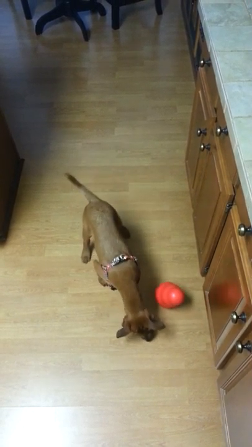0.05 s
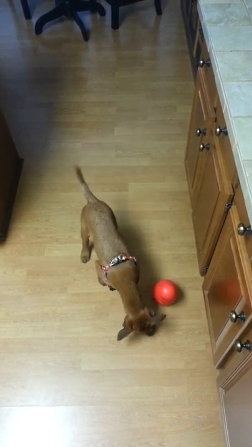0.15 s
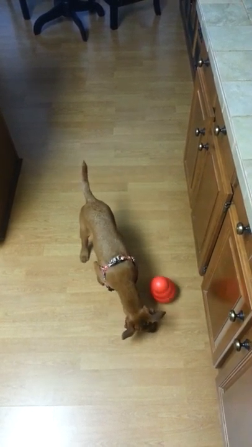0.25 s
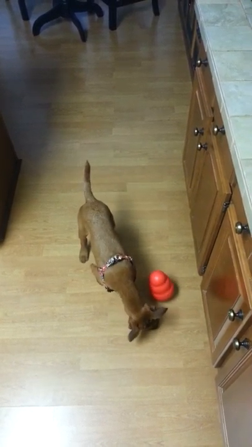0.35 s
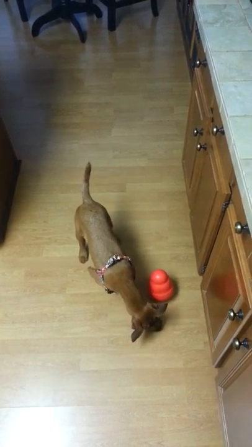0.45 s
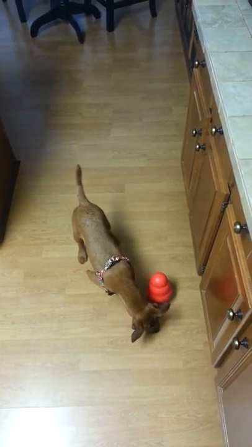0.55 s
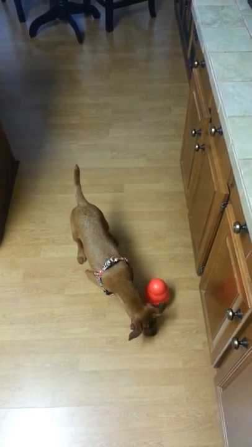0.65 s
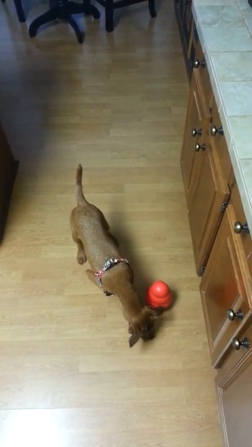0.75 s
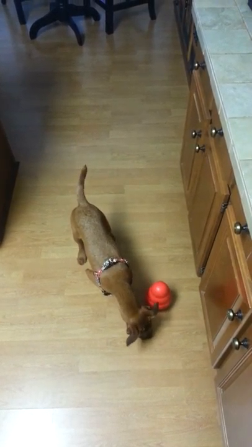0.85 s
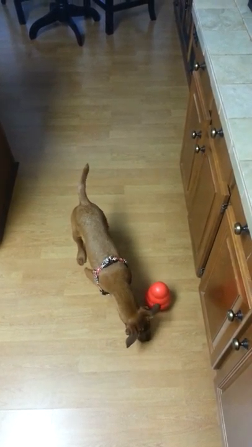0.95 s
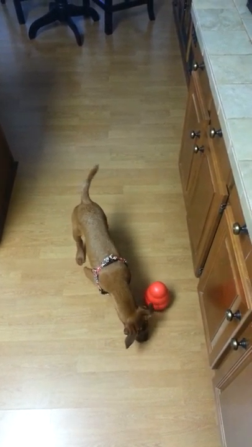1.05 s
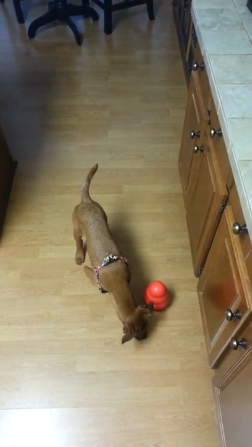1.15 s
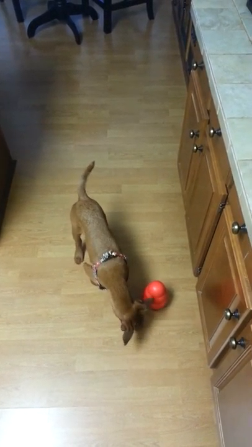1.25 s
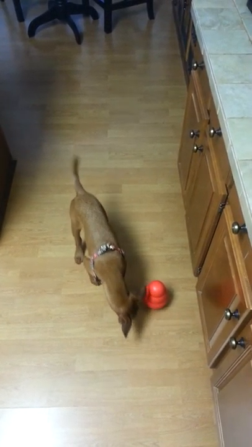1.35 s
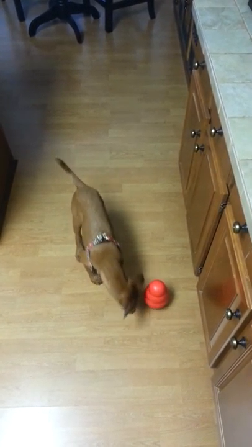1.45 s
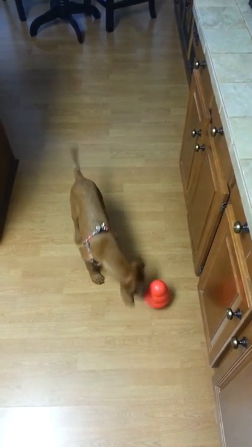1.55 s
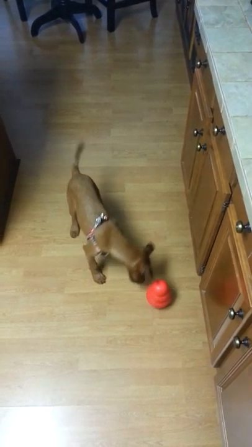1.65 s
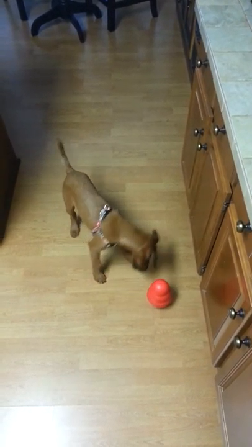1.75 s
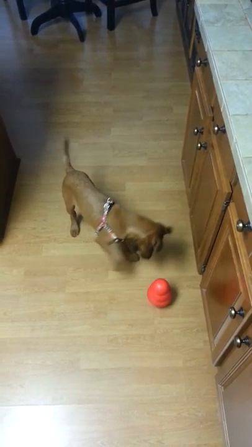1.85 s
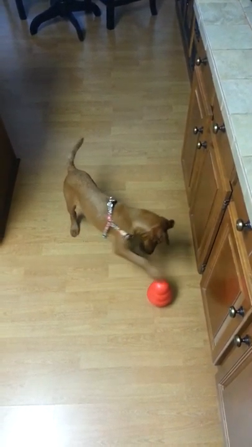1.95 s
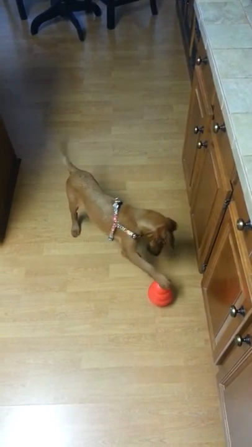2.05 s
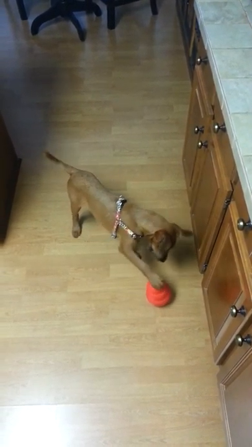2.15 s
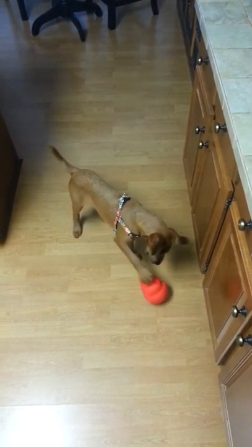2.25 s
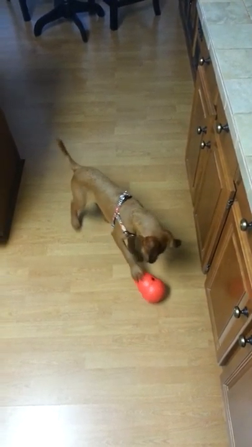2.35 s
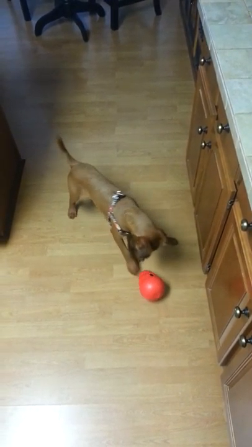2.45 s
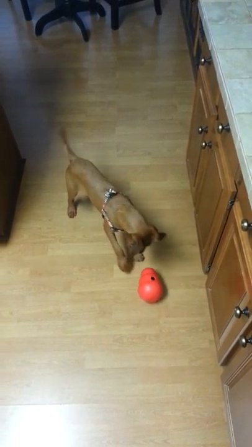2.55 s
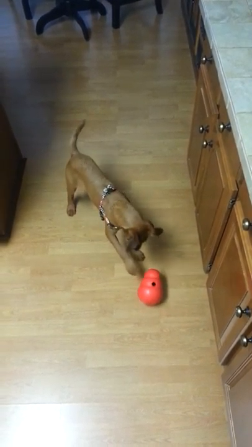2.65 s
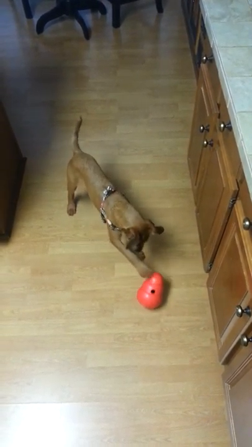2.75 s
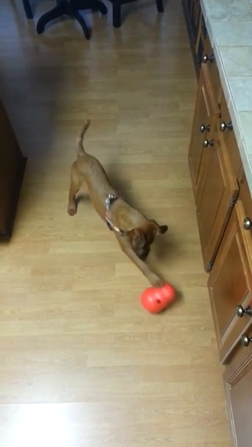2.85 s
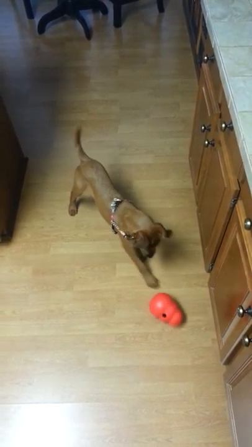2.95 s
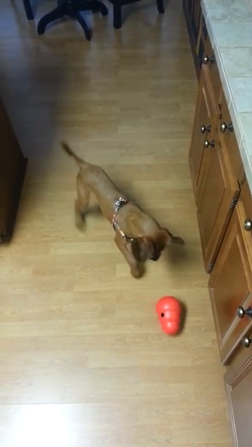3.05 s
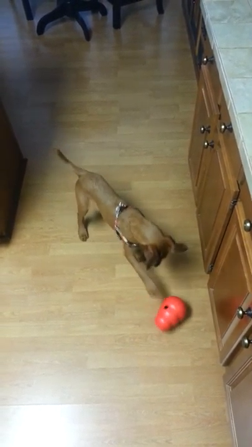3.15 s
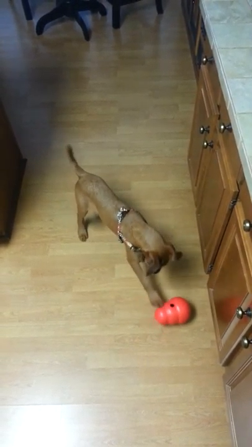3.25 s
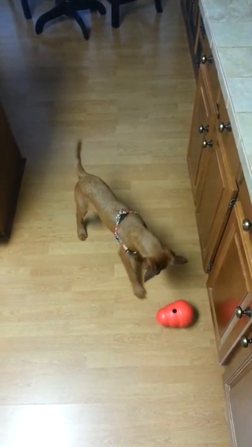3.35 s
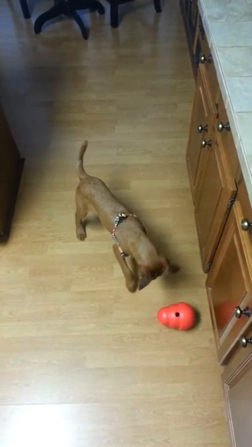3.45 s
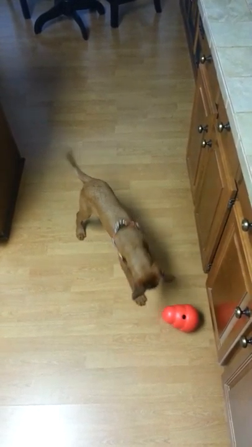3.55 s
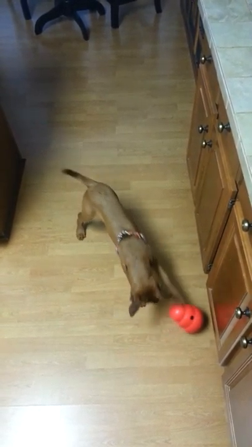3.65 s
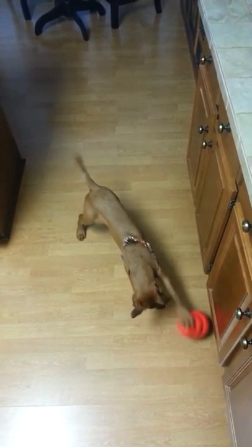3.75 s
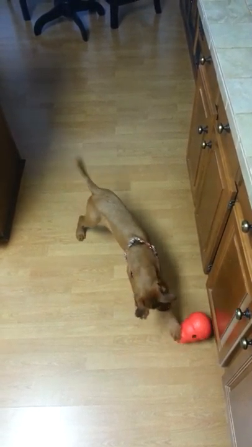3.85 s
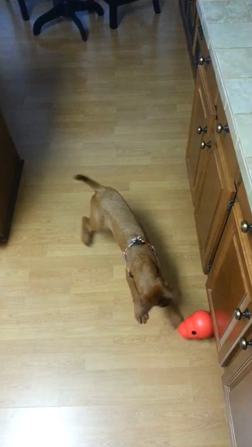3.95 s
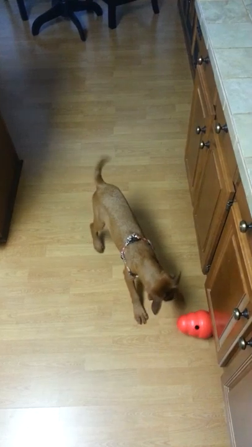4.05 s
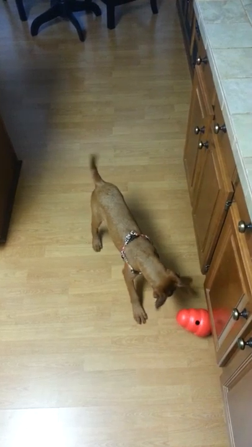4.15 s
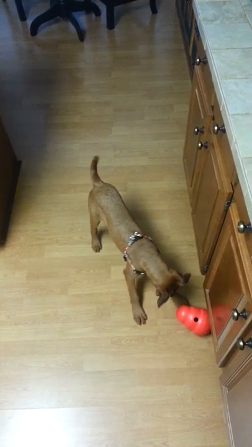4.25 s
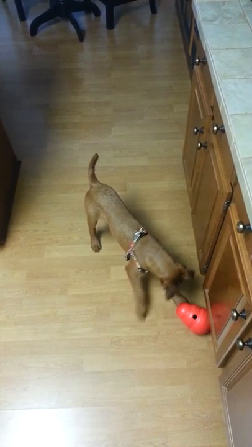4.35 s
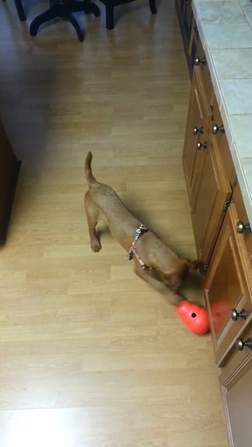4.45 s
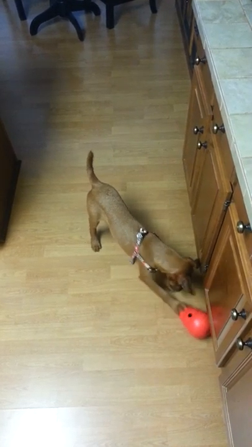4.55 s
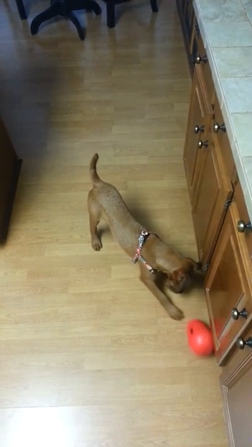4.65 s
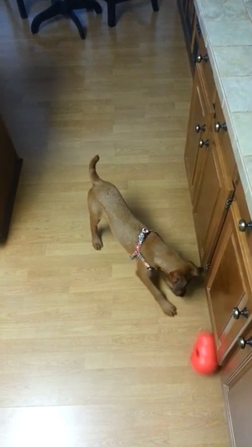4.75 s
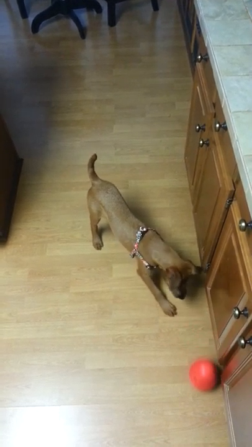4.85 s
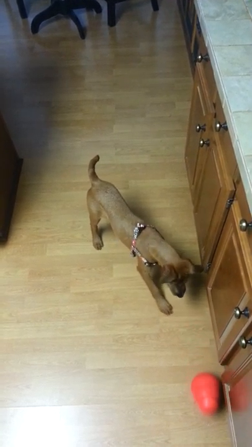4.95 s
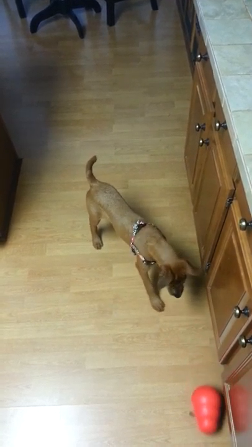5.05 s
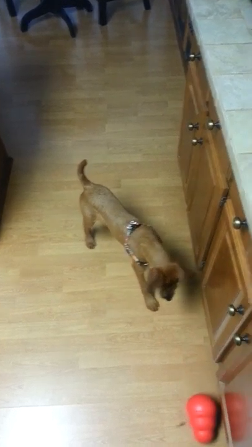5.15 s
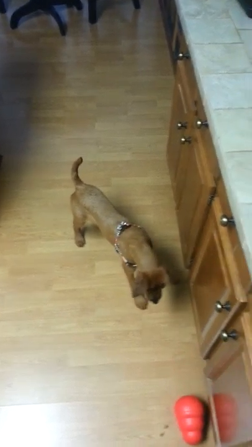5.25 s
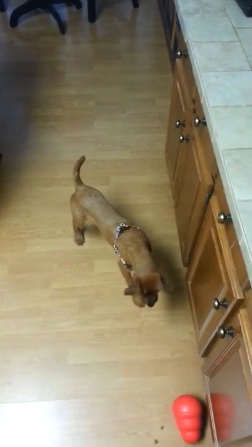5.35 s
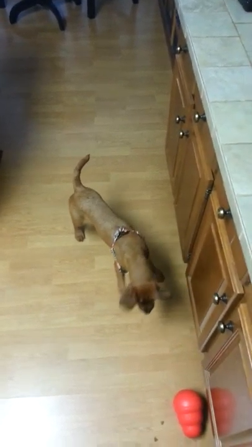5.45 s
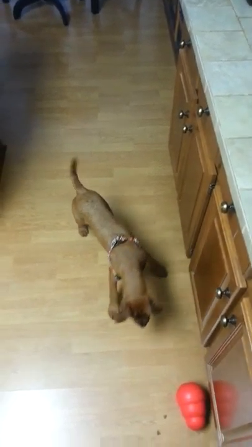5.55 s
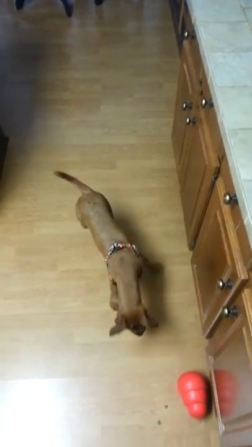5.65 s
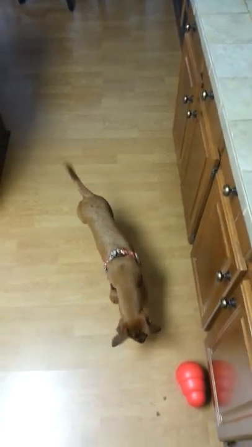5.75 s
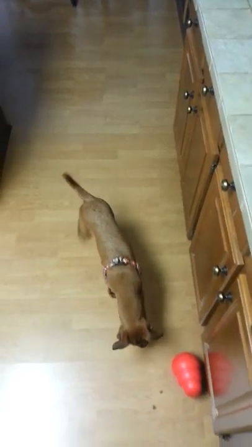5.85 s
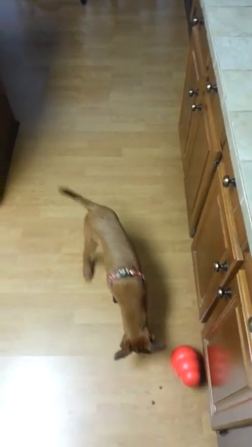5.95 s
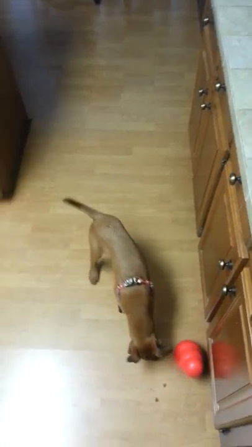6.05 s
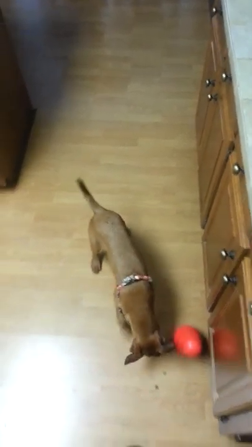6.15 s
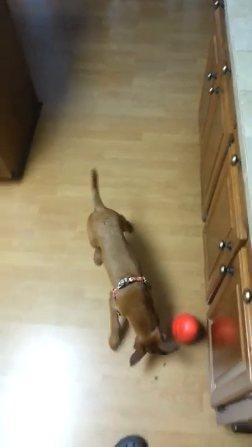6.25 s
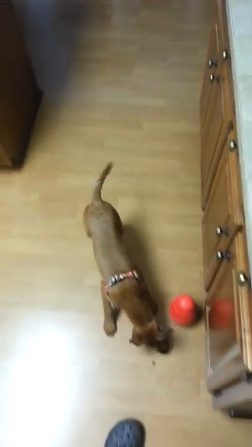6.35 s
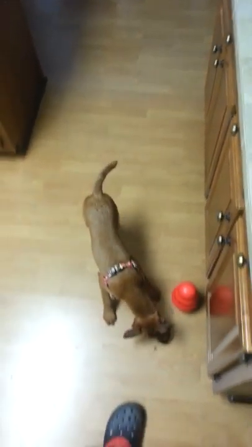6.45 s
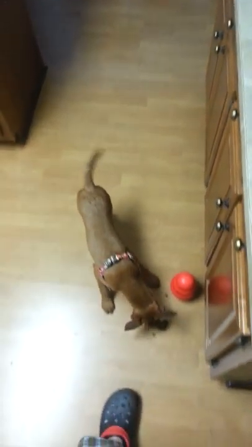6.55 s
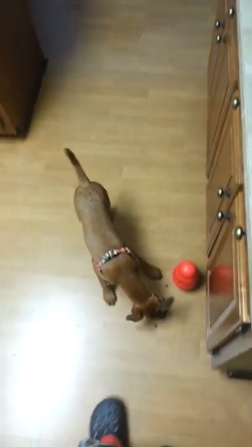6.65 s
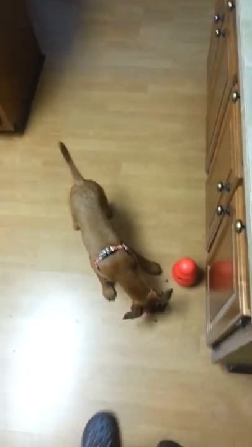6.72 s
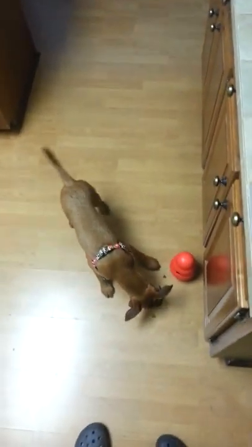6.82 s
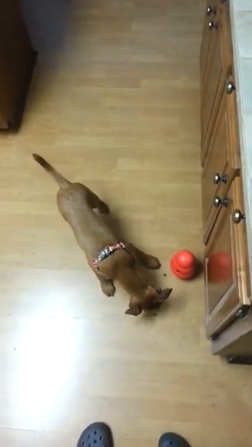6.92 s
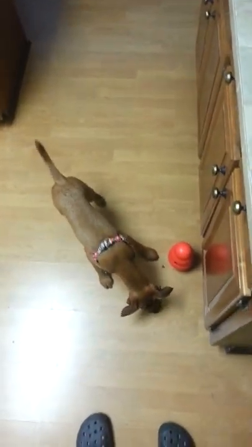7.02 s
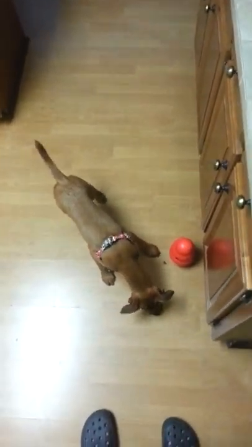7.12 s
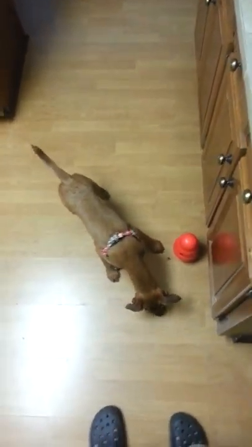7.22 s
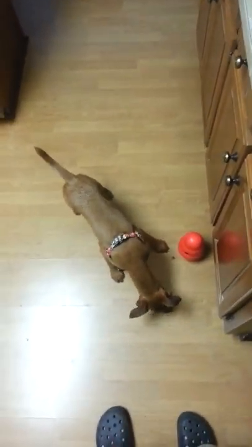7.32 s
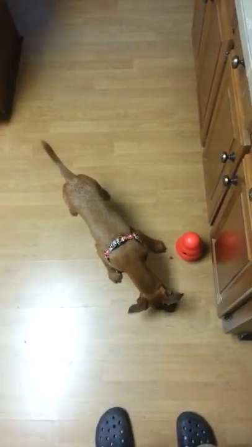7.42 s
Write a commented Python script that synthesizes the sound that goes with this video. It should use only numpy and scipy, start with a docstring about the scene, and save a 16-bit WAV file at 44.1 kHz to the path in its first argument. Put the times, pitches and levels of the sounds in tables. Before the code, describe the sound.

A puppy noses a hollow plastic treat toy over a kitchen floor; hard knocks clatter on boards and cabinets while kibble rattles inside.

```python
"""An appliance hums in a live kitchen as kibble slides faintly inside a hollow, weighted plastic toy.
A puppy shuffles its paws and noses the toy over laminate boards: dull bumps, a low roll, a lone ping.
Then the toy tips, knocks and chatters on boards and cabinet doors, ringing as its kibble bursts and slides.
Late knocks, bumps and paw steps follow as it rocks upright. Blows are decaying modes, kibble is random
impacts, and two microphones of a hand-held camera hear them from above, overloading at full scale."""
import sys
import numpy as np
from scipy import signal
from scipy.fft import rfft, irfft
from scipy.io import wavfile
from scipy.ndimage import uniform_filter1d

SR = 44100
rng = np.random.default_rng(int(sys.argv[2]) if len(sys.argv) > 2 else 0)


def wrap_up_sound(samples):
    """Save the sound to the file named by the first command line argument, as 16-bit audio."""
    columns = np.atleast_2d(samples).T
    # keep every value between -1 and 1, then stretch to whole-number steps
    tamed = np.clip(columns, -1, 1)
    steps = np.round(tamed * 32767).astype(np.int16)
    wavfile.write(sys.argv[1], SR, steps)


N = 329956


def amp(db):
    """Level law: 20 dB is a factor of ten in amplitude."""
    return 10 ** (np.asarray(db) / 20)


def unit(x):
    """Normalisation by the root mean square."""
    return x / np.sqrt(np.mean(x ** 2) + 1e-20)


def read(points, hz):
    """Interpolation of a spectrum on a logarithmic frequency axis."""
    f, value = np.transpose(points)
    return np.interp(np.log(hz + 1), np.log(f + 1), value)


def add(mix, s, sound):
    """Superposition: pressures add, here from time s onwards."""
    part = mix[max(round(s * SR), 0):][:len(sound)]
    part += sound[:len(part)]


def decay_60(t, t60):
    """Exponential damping: the level falls by 60 dB in t60 seconds."""
    return np.exp(-np.log(1000) * t / t60)


def ring(hz, t60):
    """Modal vibration: a struck mode is an exponentially damped sine."""
    t = np.arange(SR // 2) / SR
    return np.sin(2 * np.pi * hz * t) * decay_60(t, t60)


def flex(hz, t60, sweep, sweep_s=0.001, rise_s=0.00014):
    """Bending-wave dispersion: high waves arrive first on a thin board, so the pitch drops onto hz."""
    t = np.arange(SR // 2) / SR
    turns = hz * (t + sweep * sweep_s * (1 - np.exp(-t / sweep_s)))
    contact = 1 - np.exp(-t / rise_s)
    return np.sin(2 * np.pi * turns) * decay_60(t, t60) * contact


def radiated(x, corner_hz):
    """Radiation efficiency: small vibrating surfaces give off little deep bass."""
    return signal.sosfilt(signal.butter(3, corner_hz, "highpass", fs=SR, output="sos"), x)


def coloured(x, points):
    """Minimum-phase filtering: a causal response with the given spectrum shape and unit energy."""
    log_gain = np.log(amp(read(points, abs(np.fft.fftfreq(2048, 1 / SR)))))
    # the Hilbert transform of the log gain yields the minimum phase
    taps = np.fft.ifft(np.exp(np.conj(signal.hilbert(log_gain)))).real
    return signal.oaconvolve(x, taps / np.linalg.norm(taps))[:len(x)]


PORTS_M = 0.16  # spacing of the two microphones


def diffuse(pair):
    """Diffuse-field coherence: two spaced microphones hear the bass alike, the treble independently."""
    a, b = rfft(pair)
    same = np.sinc(2 * np.fft.rfftfreq(pair.shape[1], 1 / SR) * PORTS_M / 343)
    mid = a * np.sqrt((1 + same) / 2)
    side = b * np.sqrt((1 - same) / 2)
    return irfft([mid + side, mid - side], pair.shape[1])


# spectrum shape of the steady air noise: (frequency [Hz], relative density [dB per Hz])
AIR_SPECTRUM = [(18, -77), (30, -35), (113, -21), (158, -14), (184, -18.5), (227, -8), (265, -16),
                (362, -9), (423, -8), (457, -18.5), (577, -13.5), (1100, -20.5), (2220, -24), (5650, -35.5),
                (14800, -35)]
# partials of the appliance's hum: (frequency [Hz], rms level [dB])
HUM_PARTIALS = [(240, -88), (312, -62), (360.7, -58.5), (414.5, -62), (915, -72)]


def room_noise(air_db=-50.5, waver=0.47):
    """Stationary noise: diffuse filtered noise plus hum partials that waver in amplitude and phase."""
    air = diffuse(np.array([coloured(rng.standard_normal(N), AIR_SPECTRUM) for _ in range(2)]))
    t, knots = np.arange(N) / SR, np.linspace(0, N / SR, num=130)
    hum = 0
    for hz, db in HUM_PARTIALS:
        random_phasors = rng.standard_normal(len(knots)) + 1j * rng.standard_normal(len(knots))
        drift = np.interp(t, knots, random_phasors)
        partial = ((1 + waver * drift) * np.exp(2j * np.pi * hz * t)).real
        hum = hum + amp(db) * unit(partial)
    return amp(air_db) * unit(air) + hum


def pellets(size, per_s, spread_db):
    """Shot noise: random impacts of uneven strength and either sign, rms 1."""
    strength = amp(spread_db * np.minimum(rng.exponential(1, size), 4))
    sign = rng.choice([-1, 1], size)
    struck = rng.random(size) < per_s / SR
    return unit(strength * sign * struck)


def rattle(speed, bright, clump_db=5.0):
    """Granular flow: pellets tumble in clumps and strike harder the faster they slide."""
    size = len(speed)
    # octaves from 3 kHz, held constant below 700 Hz and above 9 kHz
    octaves = np.log2(np.clip(np.fft.rfftfreq(size, 1 / SR), 700, 9000) / 3000)
    slow_noise = unit(uniform_filter1d(rng.standard_normal(size), size=400))
    clumps = unit(amp(clump_db * slow_noise))
    slide = speed * clumps * pellets(size, per_s=1700, spread_db=3.0)
    return irfft(rfft(slide) * amp(bright * octaves), size)


# resonances of the shell under the pellets: (frequency [Hz], width before Q is limited to 30 [Hz], gain [dB])
SHELL_RESONANCES = [(1870, 220, -3), (2330, 45, -2), (3620, 920, 4.5)]


def shell(x):
    """Parallel resonance: the hollow plastic wall stresses a few bands."""
    wall = 0
    for hz, width, db in SHELL_RESONANCES:
        b, a = signal.iirpeak(hz, min(hz / width, 30), fs=SR)
        wall = wall + amp(db) * signal.lfilter(b, a, x)
    return x + wall


# spectrum shape of kibble on plastic: (frequency [Hz], relative density [dB per Hz])
KIBBLE_SPECTRUM = [(40, -59), (150, -23), (500, -12.5), (900, -3.5), (1300, -1), (2800, -3.5), (4500, -7),
                   (6000, -14), (9000, -18.5), (12000, -21), (15000, -37)]
# jolts throw the kibble at the wall:
# (time [s], relative level [dB], settling time constant [s], brightness [dB per octave])
KIBBLE_JOLTS = [(0.751, -48, 0.07, -1.5), (1.434, -49.5, 0.012, 1), (1.612, -50.5, 0.041, -5),
                (2.419, -21.5, 0.039, 4.5), (2.954, -31, 0.055, 3), (3.237, -35, 0.02, 3.5),
                (3.805, -36, 0.12, -1), (3.847, -19.5, 0.033, 6), (4.02, -31, 0.067, 2),
                (4.356, -48.5, 0.064, -1), (4.558, -20.5, 0.023, 7.5), (4.698, -39, 0.18, 3),
                (5.095, -34, 0.087, 1), (6.353, -32, 0.038, 1.5), (6.559, -50, 0.11, -0.5),
                (7.241, -40.5, 0.0068, 0), (7.459, -45, 0.051, -5.5)]
# kibble slides as the toy leans over:
# (start [s], swell time [s], relative level [dB], brightness [dB per octave])
KIBBLE_SLIDES = [(0.028, 0.033, -60, 1), (.13, .16, -40.5, -1), (2.27, .14, -38, -1.5),
                 (2.799, 0.079, -39.5, 0), (3.23, 0.1, -40.5, 1.5), (3.678, 0.053, -46, -1),
                 (4.859, 0.049, -29, 0.5), (4.988, 0.03, -37.5, 3), (5.73, 0.073, -58.5, -2),
                 (5.97, 0.051, -57.5, -2.5), (6.39, 0.027, -35, 1), (7.04, 0.095, -52.5, 1.5),
                 (7.309, 0.037, -49, 0.5)]
THROW_S = 0.008  # time for thrown pellets to reach the wall
SLIDE_SETTLE_S, SLIDE_GROWTH = 0.091, 1.46  # time constant of coming to rest; power of time while swelling


def kibble(jolt_db=-3, slide_db=-3):
    """Impact noise of loose grains: a burst at each jolt, a swell at each lean, both dying away."""
    t, out = np.arange(SR * 3 // 4) / SR, np.zeros(N)
    for s, swell, db, bright in KIBBLE_SLIDES:
        gathering = np.minimum(t / swell, 1) ** SLIDE_GROWTH
        speed = gathering * np.exp(-np.maximum(t - swell, 0) / SLIDE_SETTLE_S)
        add(out, s, amp(db + slide_db) * rattle(speed, bright))
    for s, db, settle, bright in KIBBLE_JOLTS:
        speed = np.minimum(t / THROW_S, 1) * np.exp(-np.maximum(t - THROW_S, 0) / settle)
        add(out, s, amp(db + jolt_db) * rattle(speed, bright))
    return shell(coloured(out, KIBBLE_SPECTRUM))


# the puppy shuffles its paws: (start [s], end [s], relative level [dB])
PAW_SHUFFLES = [(.5, 1.15, -50), (1.44, 1.72, -41), (6.7, 7.3, -31.5)]
STEPS_PER_S, STEP_HZ = 16, 330  # mean rate and central pitch
STEP_SPREAD_DB, STEP_SPREAD_OCTAVES = 1.5, 0.43  # largest deviation either way


def steps():
    """Jittered periodicity: light paw steps vary about an even pace in timing, force and pitch."""
    rows = []
    for start, end, db in PAW_SHUFFLES:
        chance = rng.uniform(-1, 1, size=(40, 3))
        for s, (late, force, pitch) in zip(np.arange(start, end, 1 / STEPS_PER_S), chance):
            when = s + 0.5 * late / STEPS_PER_S
            hz = STEP_HZ * 2 ** (STEP_SPREAD_OCTAVES * pitch)
            rows.append((when, db + STEP_SPREAD_DB * force, hz))
    return rows


# soft bumps of paws and of the rocking toy on the boards: (time [s], relative level [dB], pitch [Hz])
SOFT_BUMPS = [(0.779, -25, 424), (0.85, -25, 230), (1.018, -33, 410), (1.053, -26, 250), (4.257, -21, 610),
              (5.493, -27.5, 420), (6.376, -22, 318), (6.505, -20, 295), (6.624, -16, 437),
              (6.653, -19.5, 278), (6.81, -21, 486), (6.884, -24, 540), (6.941, -19.5, 326),
              (7.02, -28, 304)]


def bumps(level_db=-1, board_db=-11, board_hz=190):
    """Heavy damping: dull pushes on the floating floor die within hundredths of a second."""
    out = np.zeros(N)
    for s, db, hz in list(SOFT_BUMPS) + steps():
        push = flex(hz, t60=0.023, sweep=3.74, sweep_s=0.00047, rise_s=0.00084)
        board = amp(board_db) * ring(board_hz, t60=0.013)
        add(out, s, amp(db + level_db) * (push - board))
    return radiated(out, corner_hz=139)


def swing(length, peak=0.32):
    """Transient motion: the speed of one roll gathers, peaks at a share of its length and runs out."""
    u = np.arange(0, length, 1 / SR) / length
    return np.sin(np.pi * np.interp(u, [0, peak, 1], [0, 0.5, 1])) ** 2


# the ribbed toy rolls over the boards: (start [s], length [s], relative level [dB])
TOY_ROLLS = [(.76, 0.54, -48.5), (2.95, 0.53, -49), (3.903, 0.31, -37), (4.68, 0.23, -18),
             (4.85, 0.6, -32.5)]


def rolling(level_db=-3):
    """Rolling excitation: ribs strike the boards at random in a low, uneven rumble."""
    out = np.zeros(N)
    for s, length, db in TOY_ROLLS:
        speed = swing(length)[:SR]
        ribs = pellets(SR, per_s=150, spread_db=5.5)[:len(speed)]
        add(out, s, amp(db + level_db) * speed * ribs)
    # (frequency [Hz], relative density [dB per Hz])
    return coloured(out, [(40, -36), (90, -20.5), (150, 1.0), (235, -24.0), (330, 11), (600, 2),
                          (1000, 4), (2500, -55), (9000, -66)])


# single pellets that ping on the shell: (time [s], relative level [dB], pitch [Hz])
PELLET_PINGS = [(1.6187, -35.5, 1980), (2.2303, -39, 3740), (2.374, -25, 3470), (6.2442, -31, 2260),
                (6.369, -11.5, 2290)]


def pings(level_db=-8):
    """Impulse response: a lone pellet rings the shell briefly."""
    out = np.zeros(N)
    for s, db, hz in PELLET_PINGS:
        add(out, s, amp(db + level_db) * ring(hz, t60=0.019))
    return out


# knocks of the toy, and one early reflection 7 ms after the knock at 4.7865 s:
# (time [s], relative clack level [dB], clack pitch [Hz],
# relative thud level of the boards [dB], relative crack level of the shell [dB])
KNOCKS_AND_REFLECTION = [(2.3942, -22.5, 530, -24, -28), (2.966, -29, 555, -21, -22.5),
                         (2.985, -15, 562, -11.5, -12), (3.0552, -14, 595, -26, -26),
                         (3.336, -31, 800, -33.5, -25), (3.5748, -29, 562, -44, -32),
                         (3.8345, -36, 695, -25, -8.5), (3.89, -5, 495, -20, -19),
                         (3.9235, -2, 597, -5.5, -23), (4.057, -9.5, 404, -14, -26),
                         (4.2405, -22.5, 600, -34, -27), (4.518, -20.5, 500, -23, -18.5),
                         (4.7865, -4, 730, -12, -6), (4.7935, -5, 468, -15, -11.5),
                         (5.094, -13, 480, -16.5, -19.5), (5.1205, -24, 505, -23, -13.5),
                         (5.1741, -15.5, 472, -24, -23), (6.3426, -17, 474, -18.5, -18)]
# the toy topples and chatters on floor or door: (time [s], gap between contacts [s],
# relative clack level [dB], clack pitch [Hz], relative thud level [dB], relative crack level [dB])
TOY_TUMBLES = [(2.4242, .0113, 4, 566, -13.5, -5.5), (2.912, .013, -21, 610, -31.5, -24.5),
               (3.8551, 0.0084, -0.5, 620, -14, -2.5), (4.023, .0105, -9.5, 460, -16, -11),
               (4.5632, .011, -10.5, 433, -10.5, -5.5), (4.699, .012, -8.5, 402, -17, -9.5)]
# contacts of every tumble, on the rim, then the weighted belly, then a rebound:
# (clack offset [dB], thud offset [dB], crack offset [dB])
TUMBLE_CONTACTS = [(-9, 3.5, 0), (-1, -2, 0), (-20, 4, -5.5)]


def contacts():
    """Repeated impact: knocks and one reflection, plus three evenly spaced contacts for each tumble."""
    rows = list(KNOCKS_AND_REFLECTION)
    for s, gap, db, hz, boards_db, shell_db in TOY_TUMBLES:
        for k, (clack, thud, crack) in enumerate(TUMBLE_CONTACTS):
            rows.append((s + k * gap, db + clack, hz, boards_db + thud, shell_db + crack))
    return rows


# ring of the hollow toy, boards and doors: (frequency [Hz], relative level [dB], 60 dB decay time [s])
BODY_MODES = [(147.1, 2.5, 0.44), (214.7, 9, 0.2), (240.4, 6, 0.18), (277.4, 2.5, 0.16),
              (360.3, 15.5, 0.088), (533.4, 17, 0.04), (587.6, 5.5, 0.11), (728, -9.5, .3), (980, 10, 0.21),
              (1243, 4.5, 0.22), (1660, 18, .2), (1827, 4, .25), (1876, 13, 0.13)]


def knocks(thud_hz=265, thud_db=-1, clack_db=1, ring_db=-60):
    """Modal excitation: each contact clacks and thuds, and both set shell and woodwork ringing."""
    blows = np.zeros(N)
    for s, db, hz, boards_db, _ in contacts():
        rise_s = 0.00013 * amp(-0.25 * db)  # soft blows stay in contact longer
        add(blows, s, amp(db + clack_db) * flex(hz, t60=0.024, sweep=0.56, rise_s=rise_s))
        # minus: opposite signs keep clack and thud from cancelling between their pitches
        add(blows, s, -amp(boards_db + thud_db) * flex(thud_hz, t60=0.029, sweep=0.83))
    body = sum(amp(db + ring_db) * ring(hz, t60) for hz, db, t60 in BODY_MODES)
    return radiated(blows + signal.oaconvolve(blows, body)[:N], corner_hz=155)


def cracks(crack_db=-5, crack_s=0.0023, hardening=0.1):
    """Nonlinear contact: the hard shell snaps in a noise burst, favouring strong clacks."""
    t, snaps = np.arange(SR // 10) / SR, np.zeros(N)
    for s, blow_db, _, _, db in contacts():
        snap = np.exp(-t / crack_s) * rng.standard_normal(len(t))
        add(snaps, s, amp(db + crack_db + hardening * blow_db) * snap)
    # (frequency [Hz], relative density [dB per Hz])
    return coloured(snaps, [(100, -14.5), (500, 1.5), (1000, -1.5), (1400, -3.5), (1900, -1.5),
                            (2800, -8.5), (3800, -11.5), (5500, -23.5), (14000, -40.0)])


# dry ticks close to the microphones: (time [s], level [dB], pitch [Hz], left over right [dB])
NEAR_TICKS = [(3.242, -14, 7000, 5), (3.239, -21.5, 3780, 16), (5.8073, -23, 323, 6),
              (5.9224, -27.5, 1360, 21), (5.9233, -35, 503, 26), (6.9686, -21, 447, 6),
              (6.969, -27.5, 2600, -6)]


def ticks(cycles=3.1):
    """Near field: ticks so close that they carry no room, each losing 60 dB in a few cycles."""
    out = np.zeros((2, N))
    for s, db, hz, pan_db in NEAR_TICKS:
        tick = ring(hz, cycles / hz)
        add(out[0], s, amp(db + pan_db / 2) * tick)
        add(out[1], s, amp(db - pan_db / 2) * tick)
    return out


# reverberation of the kitchen: (frequency [Hz], 60 dB decay time [s])
KITCHEN_DECAY = [(120, 0.66), (400, 0.42), (1000, 0.51), (2800, 0.5), (7000, 0.47), (14000, 0.21)]


def tail(build_s=0.0016):
    """Statistical reverberation: diffuse noise in which each band dies at its own rate."""
    hz, t, z = signal.stft(diffuse(rng.standard_normal((2, SR))), SR, nperseg=256)
    damped = z * decay_60(t, read(KITCHEN_DECAY, hz)[:, None])
    decay = signal.istft(damped, SR, nperseg=256)[1]
    build_up = 1 - np.exp(-(np.arange(decay.shape[1]) / SR / build_s) ** 2)
    decay = decay * build_up
    return decay / np.linalg.norm(decay[0])


# first reflections from doors and floor: (delay [s], relative level [dB])
FIRST_ECHOES = [(.0028, -28), (.0049, -18), (.0072, -13.5), (0.0162, -33)]


def kitchen(x, direct_db, wet_db, pan_db):
    """Room response: direct sound, echoes from alternate sides and four random tails that take turns."""
    t = np.arange(N) / SR
    near = np.array([x, x])
    for k, (delay, db) in enumerate(FIRST_ECHOES):
        lag = (-1) ** k * PORTS_M / 343 / 4
        echo = np.array([np.interp(t - delay + side * lag, t, x, left=0) for side in (1, -1)])
        near = near + amp(db) * echo
    far = 0
    for k in range(4):
        # the tails fade in and out in turn, once a second each
        turn = np.maximum(np.cos(2 * np.pi * (t - k / 4)), 0)
        far = far + signal.oaconvolve((x * turn)[None], tail(), axes=1)[:, :N]
    balance = amp([[pan_db / 2], [-pan_db / 2]])
    return (amp(direct_db) * near + amp(wet_db) * far) * balance


def scene():
    """Superposition of toy, kibble, paws and room noise."""
    treats = kitchen(kibble(), direct_db=-4.0, wet_db=3.0, pan_db=-1.5)
    low = kitchen(bumps() + rolling(), direct_db=-3, wet_db=-2.5, pan_db=2.5)
    low = low + kitchen(knocks(), direct_db=0, wet_db=-2.5, pan_db=2.5)
    # the low sounds reach the left microphone five samples sooner
    low = np.array([low[0], np.roll(low[1], 5)])
    sharp = kitchen(cracks() + pings(), direct_db=2.5, wet_db=7, pan_db=-3.5)
    return low + sharp + treats + radiated(ticks(), corner_hz=138) + room_noise()


def record(dry, edge_hz=14750):
    """Transducer limits: the camera thins the bass, overloads at full scale and limits the band."""
    thin = signal.sosfilt(signal.butter(1, 110, "highpass", fs=SR, output="sos"), dry)
    overloaded = np.clip(thin, -1, 1)
    band = signal.firwin(601, edge_hz, window=("kaiser", 8), fs=SR)
    return signal.oaconvolve(overloaded, band[None], "same")


dry = scene()
out = record(dry)
wrap_up_sound(out)
```